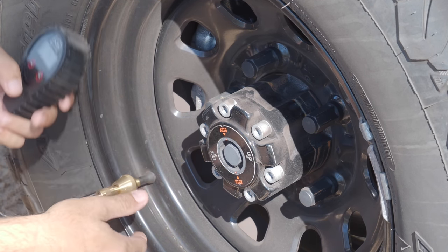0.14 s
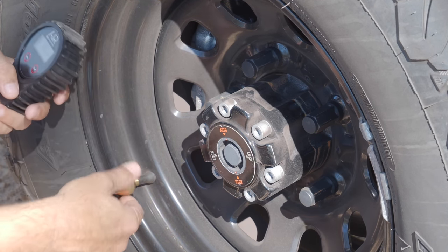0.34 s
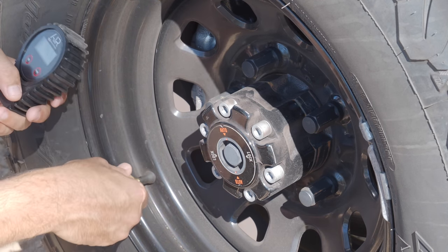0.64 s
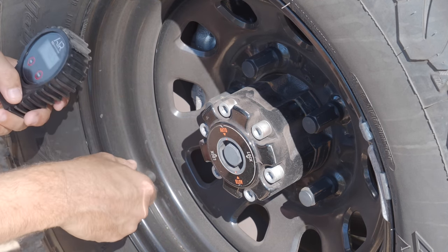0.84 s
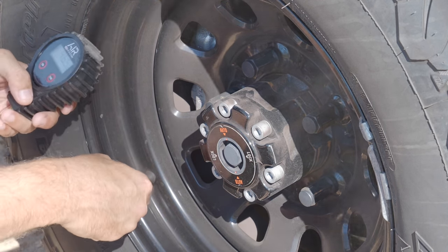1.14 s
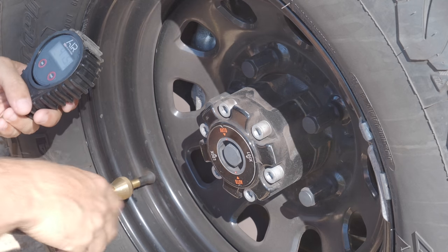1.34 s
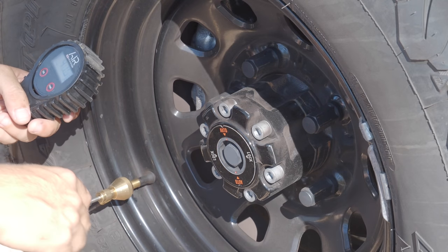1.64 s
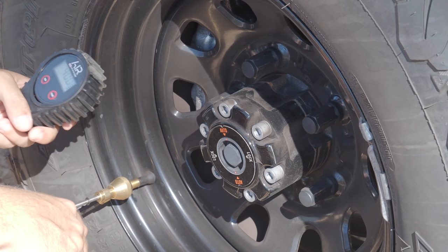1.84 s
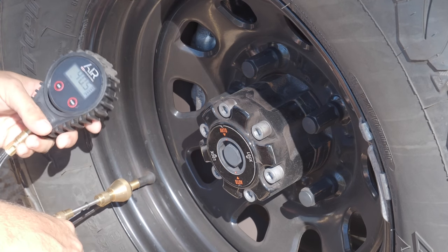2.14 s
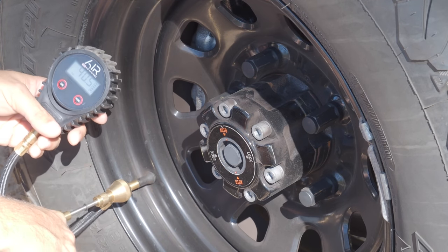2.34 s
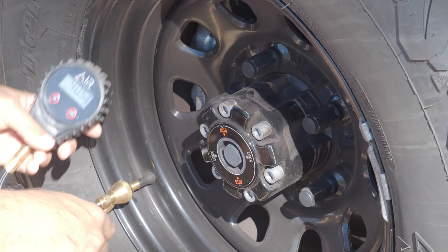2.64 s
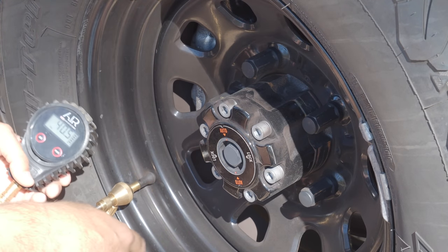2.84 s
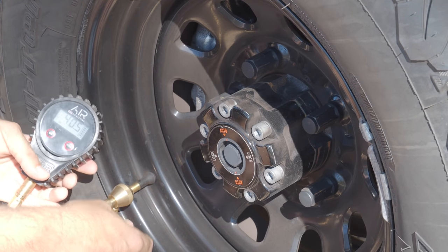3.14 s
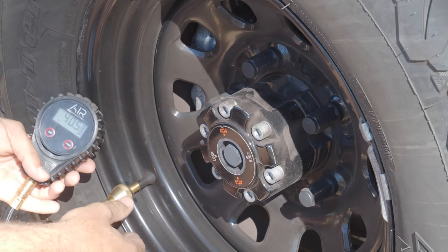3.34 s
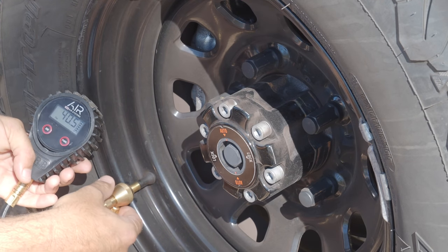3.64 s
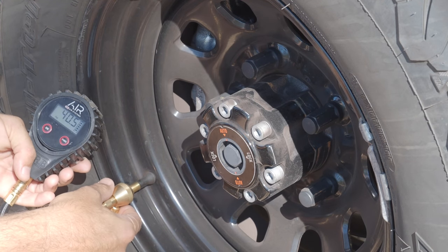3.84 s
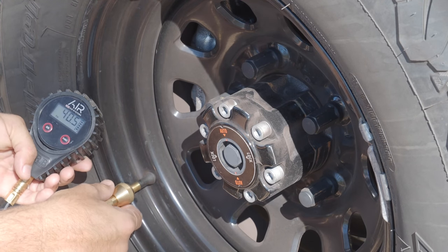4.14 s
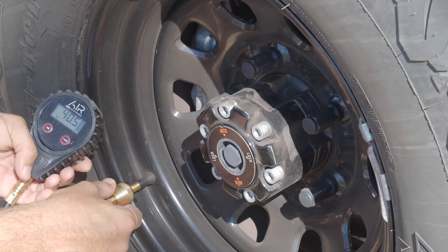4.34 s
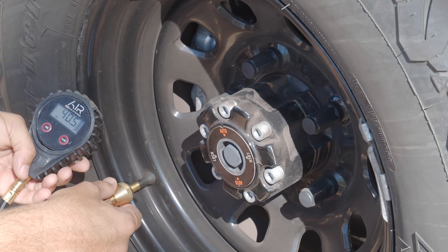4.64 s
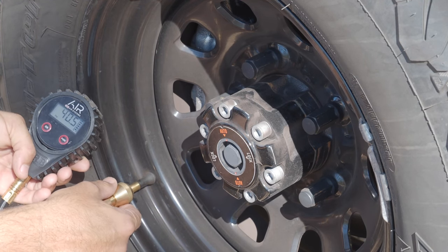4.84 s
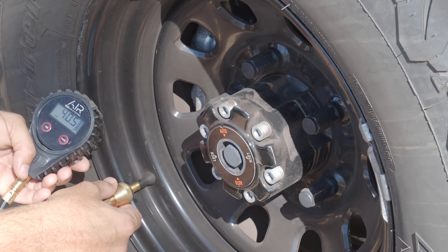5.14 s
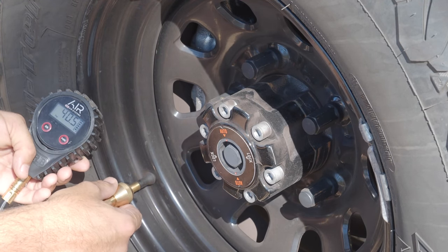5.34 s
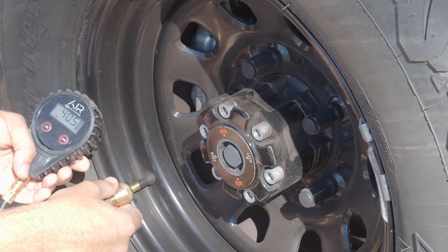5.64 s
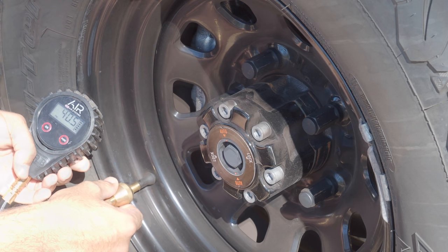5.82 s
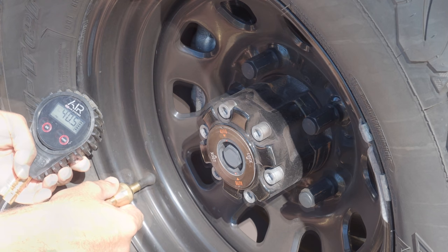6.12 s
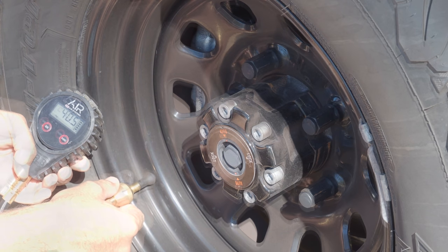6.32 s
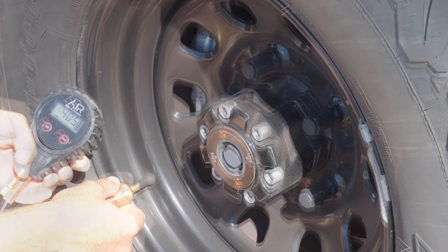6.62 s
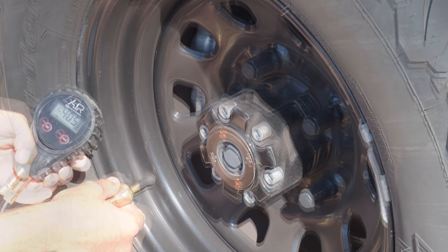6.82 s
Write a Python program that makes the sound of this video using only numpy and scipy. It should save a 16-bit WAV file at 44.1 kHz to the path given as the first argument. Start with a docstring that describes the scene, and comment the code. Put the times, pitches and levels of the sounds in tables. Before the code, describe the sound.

Faint finger ticks and a distant engine, then a dull thump and a loud, steady hiss of air escaping a tyre valve outdoors.

```python
"""Air jets from a tyre valve outdoors as a hand opens a brass deflator: turbulent noise, hissing steadily,
coloured by resonance in the bore and by reflections off wheel and hand.
Just before, fingers tick and rub on brass and rubber (noise), and dull knocks sound (damped sines).
Far off an engine speeds up, changes gear and climbs again (harmonic sines) over a low traffic wash (noise).
One microphone hears all of it; both channels are the same."""
import sys
import numpy as np
from scipy import signal
from scipy.fft import rfft, irfft
from scipy.io import wavfile
from scipy.ndimage import uniform_filter1d

SR = 44100
rng = np.random.default_rng(int(sys.argv[2]) if len(sys.argv) > 2 else 0)


def voltage_ratio(level):
    """Linear amplitude factor for a level in decibels (scalar or array-like)."""
    return 10 ** (np.asarray(level, float) / 20)


def master_out(mix):
    """Clip the mix to full scale and print it as 16-bit PCM to the path in sys.argv[1]."""
    frames = np.transpose(np.atleast_2d(mix))
    ceiling = np.clip(frames, -1, 1)
    pcm = np.round(ceiling * 32767).astype(np.int16)
    wavfile.write(sys.argv[1], SR, pcm)


N = 307818  # length in samples
TIME_S = np.arange(N) / SR
FRAME, HOP = 1024, 256  # short-time spectrum, samples
HZ = np.fft.rfftfreq(FRAME, 1 / SR)[:, None]
FRAME_S = np.arange(N // HOP + 5) * HOP / SR


def evened(x):
    """Normalisation: scales a signal to rms 1."""
    return x / np.sqrt(np.mean(x ** 2) + 1e-20)


def read(points, hz):
    """Spectral interpolation: reads a level curve on a log-frequency axis."""
    f, value = np.transpose(points)
    return np.interp(np.log(hz + 1), np.log(f + 1), value)


def add(mix, s, sound):
    """Superposition: mixes a sound in at time s."""
    part = mix[round(s * SR):][:len(sound)]
    part += sound[:len(part)]


def bump(hz, centre_hz, width_hz):
    """Resonance: a Lorentzian curve of height 1, given its full width at half height."""
    return 1 / (1 + (2 * (hz - centre_hz) / width_hz) ** 2)


def noise(field_db, patchy_db):
    """Random-phase noise: a time-frequency field in drifting patches, near rms 1 throughout."""
    real, imaginary, patches = rng.standard_normal((len(FRAME_S), len(HZ), 3)).T
    patches = uniform_filter1d(patches, size=10, axis=0)  # over frequency
    patches = evened(uniform_filter1d(patches, size=30, axis=1))  # over time
    size = voltage_ratio(field_db + patchy_db * patches)
    frame_power = (size ** 2).mean(0)
    size = size / np.sqrt(uniform_filter1d(frame_power, size=9))
    spectrum = (real + 1j * imaginary) * size
    sound = signal.istft(spectrum, nperseg=FRAME, noverlap=FRAME - HOP)[1]
    return evened(sound[:N])


# Course of the jet: t/s, level/dB, lift/dB of the broad band that the near hand raises
FLOW = [(.96, -12.5, 1), (.99, -16, 1), (1.03, -16.2, 2), (1.06, -14, 5), (1.14, -14.5, 3.5),
        (1.22, -16.5, 0), (1.29, -16.2, 2.5), (1.549, -15.5, 2.3), (1.9, -15.5, .3), (2.3, -15.5, -0.3),
        (2.75, -16, -1), (3.7, -15.5, -1.5), (4.0, -16, -2), (4.75, -15.5, -2.5), (5.148, -17, -3),
        (5.55, -15.6, -3), (6.05, -16, -2.5), (6.98, -19, -3.5)]
# Turbulence spectrum before tilt and resonances: f/Hz, relative density level/dB (per Hz)
JET = [(35, -60), (60, -23.5), (240, -28), (480, -19.5), (700, -19.5), (1270, -11.5), (2900, -11),
       (4000, -5.5), (5200, -6.5), (7000, -8), (9500, -6.5), (13000, -5), (16500, -11)]


def jet():
    """Turbulent mixing: broadband air noise, filtered by bore, wheel and hand, released by the valve."""
    open_s, rise_s = .9443, .012
    hand_hz, hand_width_hz = 6500, 3500
    tilt_db_per_octave = 0.45
    s, level_db, lift_db = np.transpose(FLOW)
    lift_db = np.interp(FRAME_S, s, lift_db)
    tilt_db = tilt_db_per_octave * np.log2((HZ + 300) / 5000)
    hand_db = lift_db * bump(HZ, hand_hz, hand_width_hz)
    field_db = read(JET, HZ) + tilt_db + hand_db + bore(lift_db) + wheel()
    # gusts of some milliseconds sway the whole band at once
    sway_db = 0.17 * evened(uniform_filter1d(rng.standard_normal(N), size=400))
    hiss = evened(noise(field_db, 0.8) * voltage_ratio(sway_db))
    opening = np.clip((TIME_S - open_s) / rise_s, 0, 1) ** 1.4
    return hiss * opening * voltage_ratio(np.interp(TIME_S, s, level_db))


# Resonances of the deflator bore, before drift: f/Hz, width/Hz, level/dB
BORE = [(4426, 860, 5.5), (9280, 510, 4.5)]
# Drift of the second bore resonance: t/s, level/dB
SECOND_RING = [(1.0, -2), (1.6, 4.5), (2.1, -1.5), (2.9, 3), (3.8, -3), (4.25, 0), (5.5, -2.2), (6.98, -1)]


def bore(lift_db):
    """Cavity resonance: the bore raises two bands by amounts that drift with time."""
    fill_in = 0.4  # dB lost by the first resonance for each dB of hand lift
    slip_s, slip_length_s, slip_db = 1.1, 0.025, -10  # brief dip as the grip lets go
    slip = np.exp(-((FRAME_S - slip_s) / slip_length_s) ** 2)
    first_db = -fill_in * lift_db + slip_db * slip
    second_db = np.interp(FRAME_S, *np.transpose(SECOND_RING))
    field_db = 0
    for (hz, width_hz, db), drift_db in zip(BORE, (first_db, second_db)):
        field_db = field_db + (db + drift_db) * bump(HZ, hz, width_hz)
    return field_db


# Reflections off rim and hand: f/Hz, width/Hz, level/dB with the hand open, level/dB with it cupped
WHEEL = [(1360, 510, 3.5, 1.5), (1740, 160, 0, -3), (2340, 540, 2, 2.5), (3430, 510, 1.5, 1.5),
         (5930, 230, -1.2, 4.5), (6310, 190, 1, 7), (7100, 300, -1, 3.5), (8000, 310, 3.5, 2.5),
         (8270, 340, 0.3, 4.5), (8900, 200, 0.5, -1.5), (9380, 250, -2, 3), (9740, 250, -6, -1),
         (10400, 300, -1, 2.5), (10670, 300, -5, -4.5), (11000, 450, 0.5, 2), (11850, 250, -3.5, -1.5),
         (12500, 300, 5, -3.5), (13150, 300, -3, 3.5), (13600, 200, 0, -3), (14000, 250, 2, 5),
         (14600, 300, 1, -2), (15200, 300, 3, 5)]


def wheel():
    """Interference: reflections add up or cancel, shifting as the hand gradually closes."""
    cup_from_s, cup_to_s = 1.14, 5.3
    cupped = np.clip((FRAME_S - cup_from_s) / (cup_to_s - cup_from_s), 0, 1)
    field_db = 0
    for hz, width_hz, open_db, cupped_db in WHEEL:
        band_db = open_db + (cupped_db - open_db) * cupped
        field_db = field_db + band_db * bump(HZ, hz, width_hz)
    return field_db


# Dull knocks as the valve is gripped and pulled open:
# t/s, level/dB before the soft onset, f/Hz, t60/s (time to decay by 60 dB)
THUMPS = [(.7045, -50, 900, .02), (.9365, -33, 750, .025), (.938, -38, 1300, .03), (.9465, -25, 140, .03),
          (.9595, -15, 440, .024), (.962, -22, 170, .025)]


def thumps():
    """Damped free vibration: short rings of the valve stem and sidewall."""
    rise_s = .0025
    out, t = np.zeros(N), np.arange(4000) / SR
    onset = 1 - np.exp(-t / rise_s)
    for s, db, hz, t60 in THUMPS:
        decay = voltage_ratio(db - 60 * t / t60)
        add(out, s, decay * np.sin(2 * np.pi * hz * t) * onset)
    return out


# Finger ticks on brass and rubber: t/s, rms level/dB before decay, centre f/Hz, decay to 1/e/s
TICKS = [(.19, -51, 3000, .002), (0.446, -57, 8000, .0007), (0.452, -52, 4930, .003),
         (.582, -58, 9050, .0007), (.59, -53, 11000, .0007), (0.595, -58, 2500, .003),
         (.654, -53, 10000, .0012), (.661, -58, 8000, .0007), (.6775, -46, 9000, .0007),
         (.6905, -45, 6500, .0008), (0.704, -40, 1900, .004), (.7225, -50, 5000, 0.0014),
         (.7465, -50, 10000, .0007), (.7625, -48, 9000, .0007), (.778, -48, 10000, .0006),
         (0.786, -48, 11000, .0006), (.789, -37, 9000, .0006), (.8045, -50, 9000, .0007),
         (.8715, -45, 11500, .0012), (0.93, -55, 9000, 0.0031)]


def ticks():
    """Impulsive contact: each tick is a wide-band puff of noise that dies exponentially."""
    out, t = np.zeros(N), np.arange(1024) / SR
    octaves = np.log2(np.fft.rfftfreq(1024, 1 / SR) + 1)
    for s, db, centre_hz, length_s in TICKS:
        band = bump(octaves, np.log2(centre_hz), 1.2)  # width in octaves
        puff = evened(irfft(rfft(rng.standard_normal(1024)) * band))
        add(out, s, voltage_ratio(db) * puff * np.exp(-t / length_s))
    return out


# Strokes of skin over the valve: middle t/s, peak level/dB, added to the steady rustle,
# half length/s (to 1/e)
RUB = [(0.148, -60, .03), (.25, -68, 0.033), (0.365, -58, .018), (.452, -61, 0.0072), (0.537, -58, 0.018),
       (.595, -63, .012), (.68, -60, 0.018), (0.732, -58, .025), (0.795, -61, 0.013), (0.897, -60, 0.058)]
# Rustle spectrum: f/Hz, relative density level/dB (per Hz)
RUB_COLOUR = [(900, -20), (1600, -1), (4600, -7.5), (8000, -14), (12000, -18.5), (16500, -18)]


def rub():
    """Sliding friction: a soft rustle swells with each short stroke over a steady floor."""
    rest_db, patchy_db = -68, 1
    strokes = sum(voltage_ratio(db) * np.exp(-((TIME_S - s) / half_s) ** 2) for s, db, half_s in RUB)
    return noise(read(RUB_COLOUR, HZ), patchy_db) * (voltage_ratio(rest_db) + strokes)


# Course of the engine: t/s, firing f/Hz, level/dB before order strengths and exhaust
ENGINE = [(0, 41.9, -41), (.24, 39.4, -42.5), (.452, 37.66, -43.5), (.71, 44.8, -41), (.8, 48.1, -43.5),
          (.94, 50.3, -45), (.99, 50.7, -57), (1.54, 64.3, -53), (1.81, 70.5, -54), (2.06, 60, -59),
          (2.59, 44.2, -66), (2.76, 40.3, -55), (3.32, 45.9, -56), (4.01, 54.8, -59), (4.51, 61.9, -51),
          (4.86, 70.3, -47), (5.18, 75.2, -48), (5.61, 83.2, -44.5), (5.82, 84, -49), (5.92, 81, -59),
          (6.2, 70, -59), (6.29, 66, -53), (6.42, 61, -67), (6.59, 54.2, -56), (6.98, 55.3, -62)]
# Exhaust pipe response, strongest from about 65 to 100 Hz: f/Hz, level/dB
EXHAUST = [(38, -19), (50, -4), (65, -0.5), (82, -1), (100, 0), (120, -7.5), (145, -9), (175, -11.5),
           (260, -26)]
# Strength of the firing orders from the first up, before the exhaust: level/dB
ORDERS_DB = [-0.3, -.4, -0.5, -8, -10, -22]


def engine():
    """Harmonic synthesis: slightly wavering firing orders, locked in step so that each firing throbs."""
    s, firing_hz, loud_db = np.transpose(ENGINE)
    hz = np.interp(TIME_S, s, firing_hz)
    loud_db = np.interp(TIME_S, s, loud_db)
    turns = np.cumsum(hz) / SR  # firing cycles so far
    waver = rng.standard_normal((N, len(ORDERS_DB)))
    waver = evened(uniform_filter1d(waver, size=2500, axis=0)).T
    out = np.zeros(N)
    for k, (order_db, w) in enumerate(zip(ORDERS_DB, waver), start=1):
        level_db = loud_db + order_db + read(EXHAUST, k * hz) + 1.3 * w
        phase = 2 * np.pi * k * turns + 0.37 * w
        out += np.sqrt(2) * voltage_ratio(level_db) * np.sin(phase)  # root 2: rms to peak
    return out


# Traffic spectrum: f/Hz, relative density level/dB (per Hz)
WASH = [(15, -45), (25, -33), (58, -21), (91, -14), (137, -5), (269, -16), (500, -16.5), (812, -7),
        (1300, -15.5), (2460, -29), (4820, -26.5), (9000, -37), (16500, -41)]


def wash():
    """Incoherent summation: distant traffic merges into low, steady noise."""
    level_db, patchy_db = -55.5, 1.4
    return voltage_ratio(level_db) * noise(read(WASH, HZ), patchy_db)


def scene():
    """Linear superposition: all sources add at one microphone."""
    mono = jet() + thumps() + ticks() + rub() + engine() + wash()
    return np.array([mono, mono])


def top_cut(x):
    """Nothing passes above the cut-off."""
    return signal.sosfilt(signal.butter(12, 16740, fs=SR, output="sos"), x)


def record(dry):
    """Band limitation: a linear-phase low-pass removes the highest treble."""
    edge_hz = 15810
    lowpass = signal.firwin(1023, edge_hz, window=("kaiser", 9), fs=SR)
    limited = signal.oaconvolve(dry, lowpass[None], "same")
    return top_cut(limited)


dry = scene()
out = record(dry)
master_out(out)
```